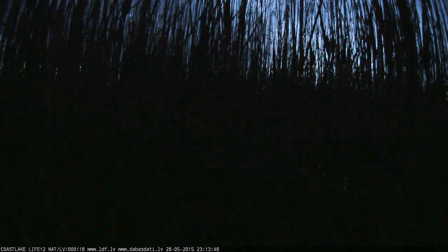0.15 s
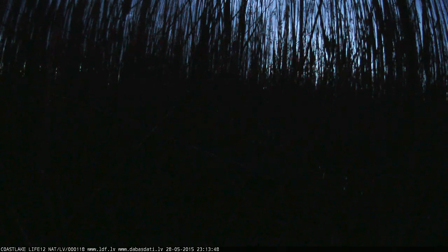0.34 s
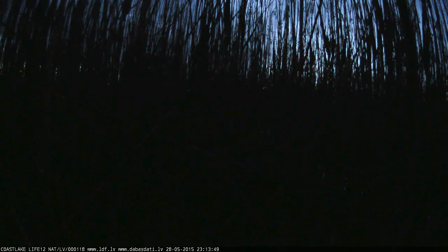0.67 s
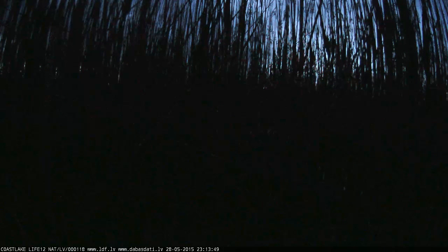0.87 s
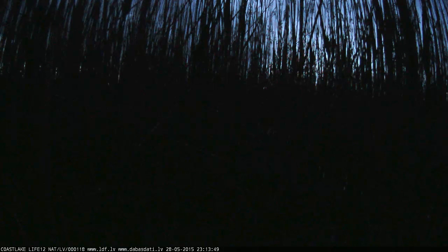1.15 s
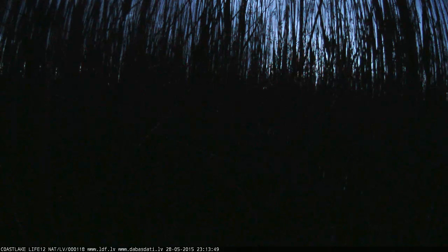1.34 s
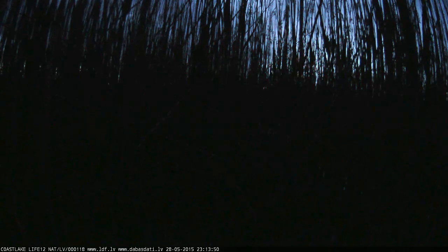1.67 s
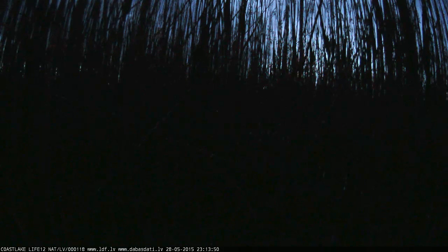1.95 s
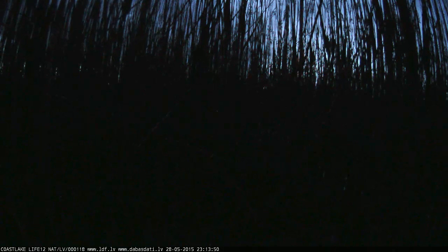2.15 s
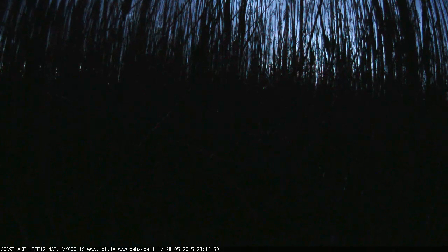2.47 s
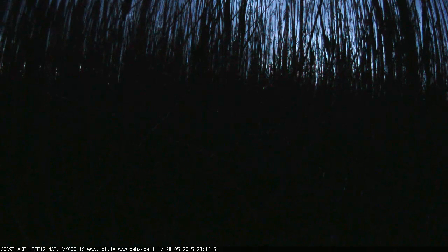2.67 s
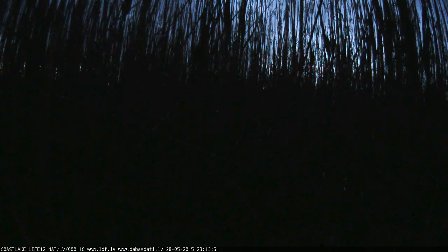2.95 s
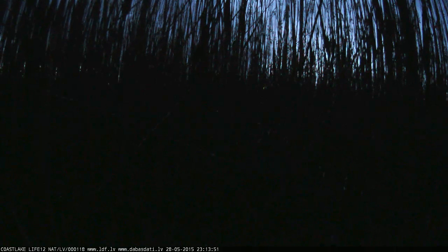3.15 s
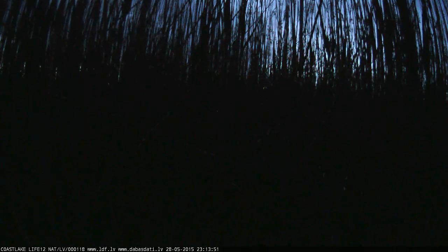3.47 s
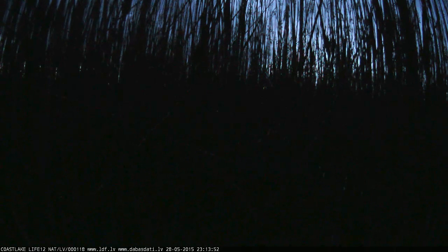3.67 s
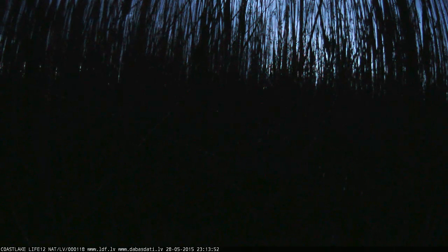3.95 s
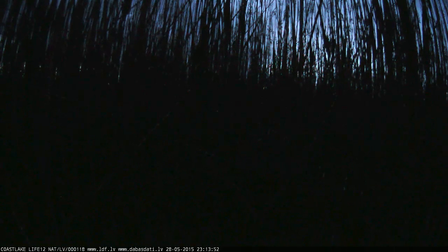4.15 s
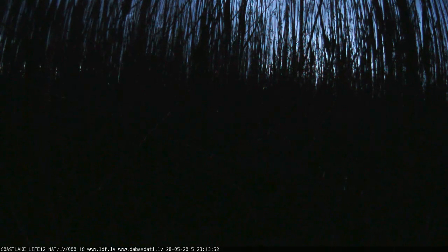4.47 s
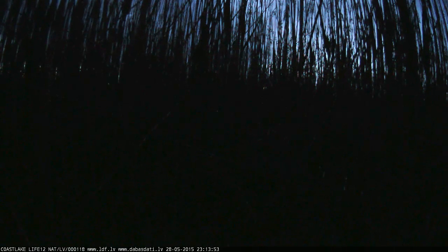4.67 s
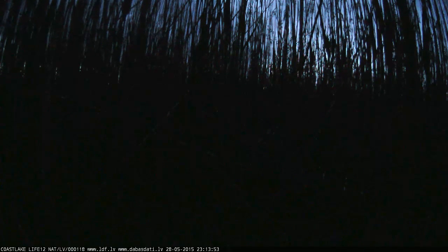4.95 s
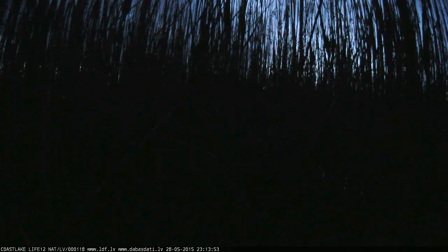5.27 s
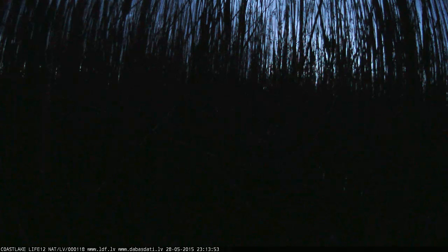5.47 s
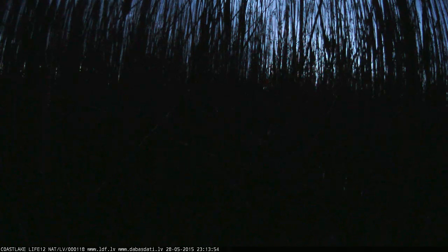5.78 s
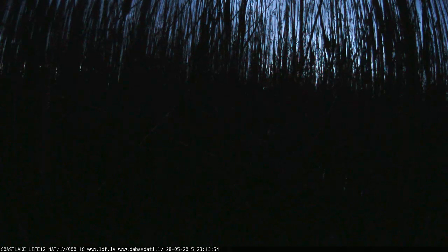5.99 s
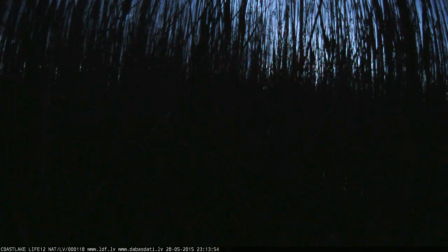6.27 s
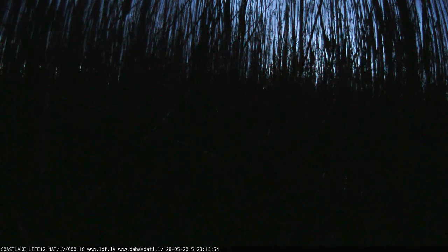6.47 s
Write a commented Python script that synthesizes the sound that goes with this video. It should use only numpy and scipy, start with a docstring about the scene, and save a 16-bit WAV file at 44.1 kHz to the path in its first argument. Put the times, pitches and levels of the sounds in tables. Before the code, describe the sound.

A bittern booms twice in quiet reeds while a small bird's sharp, buzzy peeps speed up over a distant chattering warbler.

```python
"""A bittern's deep boom opens a still evening in a reed bed: its inflated gullet rings as an almost
pure tone, and far shores send it back. It gulps and booms again; later a second bittern hoots far off.
A small marsh bird nearby gives sharp, buzzy peeps, bursts of pulses that ring on in the reeds,
and they come faster and faster. A distant warbler chatters in raspy glides,
over low background noise whose level wavers and the hiss of the microphone."""
import sys
import numpy as np
from scipy import signal
from scipy.fft import rfft, irfft
from scipy.io import wavfile
from scipy.ndimage import uniform_filter1d

SR = 44100
rng = np.random.default_rng(int(sys.argv[2]) if len(sys.argv) > 2 else 0)


def unload_audio(sound):
    """Save the sound as a 16-bit wav file, at the path given as the first command line argument."""
    columns = np.transpose(np.atleast_2d(sound))
    # keep every value between -1 and 1, then stretch to whole-number steps
    steps = np.round(np.clip(columns, -1, 1) * 32767)
    wavfile.write(sys.argv[1], SR, steps.astype(np.int16))


N = 291942


def gain_of(db):
    """Decibels to a gain factor."""
    return 10 ** (np.asarray(db) / 20)


def unit_rms(x):
    """Scales a sound to an rms of 1."""
    return x / np.sqrt(np.mean(x ** 2) + 1e-20)


def add(mix, start_s, sound):
    """Mixes a sound in at its start time, which may lie before zero."""
    at = round(start_s * SR)
    sound, part = sound[max(-at, 0):], mix[max(at, 0):]
    part[:len(sound)] += sound[:len(part)]


def drift(t, hz):
    """Smooth random modulation, rms about 1, made of rates up to hz."""
    rates, phases = rng.random((2, 24, 1))
    return np.sin(2 * np.pi * (hz * rates * t + phases)).sum(0) / np.sqrt(len(rates) / 2)


def band(x, low_hz, high_hz, order=2):
    """Band-passes a sound."""
    return signal.sosfilt(signal.butter(order, [low_hz, high_hz], "band", fs=SR, output="sos"), x)


def equalise(x, curve):
    """Applies an EQ curve of (frequency_hz, gain_db) points."""
    hz, db = np.transpose(curve)
    bins_hz = np.fft.rfftfreq(len(x), 1 / SR)
    gains = gain_of(np.interp(np.log(bins_hz + 1), np.log(hz), db))
    return irfft(rfft(x) * gains, len(x))


def scatter(x, t60_s, build_s):
    """Countless small reflections build up and decay, in a reverb tail cut at 3 s."""
    t = np.arange(3 * SR) / SR
    build_up = 1 - np.exp(-(t / build_s) ** 2)
    tail = rng.standard_normal(len(t)) * 10 ** (-3 * t / t60_s) * build_up
    return signal.fftconvolve(x, tail / np.linalg.norm(tail))[:N]


# tone colour of still air and microphone hiss: frequency_hz, relative_db
AIR_EQ = [(25, 0.5), (50, -5.5), (80, -15), (130, -12), (200, -16), (270, -19), (500, -23), (1000, -25),
          (1600, -22.5), (2200, -22.5), (3100, -21), (3700, -25.5), (4500, -27.5), (12000, -28.5)]

def background(wash_db=-60.5, low_noise_db=-66.6, waver_db=2.5):
    """A faint wash of marsh air and hiss, over low background noise whose level wavers."""
    waver = gain_of(waver_db * drift(np.arange(N) / SR, hz=5.7))
    low_noise = unit_rms(waver * band(rng.standard_normal(N), low_hz=22.8, high_hz=74, order=1))
    wash = unit_rms(equalise(rng.standard_normal(N), AIR_EQ))
    return gain_of(wash_db) * wash + gain_of(low_noise_db) * low_noise


# the pitches that the reed bed throws back best: frequency_hz, gain_db
REED_EQ = [(1500, -10), (2200, -3.5), (2420, 5), (2550, 0), (2660, 6), (2760, 1), (2880, 2.5), (3000, 2.5),
           (3130, 6.5), (3300, -3), (3800, -10)]

def reed_bed(x, stems_db=-12, marsh_db=-11):
    """A quick scatter from the nearest stems and a long ring over the marsh."""
    stems = gain_of(stems_db) * scatter(x, t60_s=.31, build_s=.015)
    marsh = gain_of(marsh_db) * scatter(x, t60_s=1.78, build_s=.052)
    return equalise(stems + marsh, REED_EQ)


def syllable(length_s, pitch_hz, level_db, partial, glide, *, bend, side_db, rasp=.3, waver_hz=24):
    """A raspy partial and its two neighbours glide (octaves/s); bend (octaves) shifts both ends."""
    t = np.arange(0, length_s, 1 / SR) - length_s / 2
    detune = 1 + .005 * rng.standard_normal()  # no two syllables have quite the same pitch
    pitch = pitch_hz * detune * 2 ** (glide * t + bend * (2 * t / length_s) ** 2)
    phase = 2 * np.pi * np.cumsum(pitch + waver_hz * drift(t, hz=248)) / SR
    tone = np.sin(phase) * (1 + 2 * gain_of(side_db) * np.cos(phase / partial))
    roughness = 1 + rasp * drift(t, hz=222.3)
    return gain_of(level_db) * unit_rms(tone * roughness * signal.windows.tukey(len(t), .28))


def sing(table, **voice):
    """Sings one kind of syllable at each of its start times."""
    out = np.zeros(N)
    for starts_s, *note in table:
        for start_s in starts_s:
            add(out, start_s, syllable(*note, **voice))
    return out


# clear falling slurs: starts_s, length_s, pitch_hz, relative_db
CLEAR_SLURS = [((.461, .559), .034, 2400, -59.5), ((1.311, 1.511), .026, 2420, -59), ((1.692,),
               .02, 2200, -63), ((2.408, 2.506), .029, 2160, -62.3), ((4.375,), .023, 2436, -59.5),
               ((5.84,), .019, 2046, -65), ((6.555,), .024, 1780, -68)]
# harsh falling ticks: starts_s, length_s, pitch_hz, relative_db
HARSH_TICKS = [((.233, .279), .028, 2540, -63), ((2.098, 2.142, 2.19), .025, 2680, -62), ((2.744, 2.788),
               .023, 2850, -65)]
# quick upward zips: starts_s, length_s, pitch_hz, relative_db
RISING_ZIPS = [((1.677, 1.845), .027, 2600, -63), ((1.908,), .034, 2620, -60)]
# low, gently rising notes: starts_s, length_s, pitch_hz, relative_db
LOW_CHIRPS = [((4.495, 4.538), .02, 1860, -67.5), ((4.44, 4.958, 5.4, 5.69, 6.052), .026, 1850, -70),
              ((5.004, 5.05), .022, 1930, -63.5), ((5.275, 5.517), .052, 1950, -65), ((6.1, 6.15),
              .024, 1900, -65)]
# thin whistles: starts_s, length_s, pitch_hz, relative_db, partial_number, glide_octaves_per_s
THIN_WHISTLES = [((.25, .563, .754), .035, 3030, -65.3, 5, -2.6), ((.775, .82), .044, 2485, -62, 3, .4),
                 ((.87,), .061, 2590, -62, 3, .3), ((1.048,), .061, 2510, -62, 3, -.7), ((3.424,),
                 .022, 2370, -66, 5, .8), ((3.455, 3.491, 3.537), .027, 2460, -58, 5, 1)]
# arched nasal notes: starts_s, length_s, pitch_hz, relative_db, partial_number, glide_octaves_per_s
NASAL_NOTES = [((.01, .027), .016, 2610, -62, 3, 4), ((.042, .059, .076), .018, 2770, -60, 3, 3), ((.15,),
               .08, 2790, -66.5, 3, .8), ((1, 1.286, 1.482), .021, 2510, -63, 4, -.3), ((2.975, 3.2),
               .09, 2335, -65.5, 4, 1), ((4.112, 4.18), .047, 2465, -62.5, 6, -1.5)]

def warbler(direct_db=1, wet_db=3):
    """Six kinds of syllable, each with its own glide and harshness; distance makes them wet."""
    song = (sing(CLEAR_SLURS, partial=3, glide=-17, bend=.08, side_db=-11)
            + sing(HARSH_TICKS, partial=3, glide=-21, bend=.14, side_db=0)
            + sing(RISING_ZIPS, partial=3, glide=16, bend=-.02, side_db=-9)
            + sing(LOW_CHIRPS, partial=3, glide=5.2, bend=-.04, side_db=-12, rasp=.4)
            + sing(THIN_WHISTLES, bend=-.02, side_db=-12.5, rasp=.25, waver_hz=18)
            + sing(NASAL_NOTES, bend=-.035, side_db=-4.5, rasp=.45))
    song = band(song, low_hz=1390, high_hz=3300, order=5)
    return gain_of(direct_db) * song + gain_of(wet_db) * reed_bed(song)


def peep(length_s, top_hz, end_hz, level_db, pulse_hz, width_hz=205, chirp=.23, flutter_db=1.1):
    """A burst of fast, uneven pulses sounds through a resonance that arches up and flicks down."""
    t = np.arange(0, length_s, 1 / SR)
    progress = t / length_s
    jitter = 1 + .02 * drift(t, hz=130.2)
    rate_hz = pulse_hz * np.interp(progress, [0, .5, 1], [1, 1, .89]) * jitter
    cycles = np.cumsum(rate_hz) / SR - .35  # the first pulse lands .35 of a cycle in
    resonance_hz = np.interp(progress, [0, .36, .62, 1], [.95 * top_hz, top_hz, .95 * top_hz, end_hz])
    harmonics = np.arange(6, 17)[:, None]
    off_peak = (harmonics * rate_hz - resonance_hz) / width_hz
    # lower partials come a little late, so each pulse is a tiny falling chirp
    partials = np.cos(2 * np.pi * harmonics * cycles + chirp * off_peak ** 2)
    buzz = (np.exp(-off_peak ** 2 / 2) * partials).sum(0)
    contour_db = np.interp(progress, [0, .4, .75, 1], [-4.5, 1.5, -1.5, -6])
    envelope = gain_of(contour_db + flutter_db * drift(t, hz=170)) * signal.windows.tukey(len(t), .08)
    return gain_of(level_db) * unit_rms(envelope * buzz)


# peeps that crowd ever closer: start_s, length_s, top_hz, end_hz, level_db
NEAR_PEEPS = [ (2.325, .0282, 2727, 2400, -42), (3.0328, .029, 2835, 2470, -38.5),
              (3.667, .034, 2864, 2400, -40.5), (4.2233, .028, 2860, 2490, -38),
              (4.7233, .036, 2960, 2410, -38.5), (5.1768, .032, 2890, 2415, -39.5),
              (5.466, .036, 2930, 2430, -38.5), (5.7427, .035, 2870, 2560, -37.5),
              (5.968, .0355, 2950, 2390, -38.5), (6.189, .032, 2940, 2450, -38),
              (6.411, .039, 2810, 2590, -38), (6.613, .03, 2850, 2450, -38.5)]
# the buzz quickens as the bird warms up, then holds: time_s, pulse_hz
BUZZ_RATE = [(2.325, 259.5), (4.5, 275.2)]
# first reflections off nearby reeds and water: delay_s, gain_db
EARLY_REFLECTIONS = [(.0047, -15), (.0094, -7.5), (.031, -16), (.046, -17.5), (.076, -17)]

def near_bird(low_noise_db=-25.8):
    """Close peeps with their first reflections and the ring of the reeds."""
    # swaying reeds answer a little differently: the peeps take turns on three reverb sends
    sends = np.zeros((3, N))
    for i, (start_s, *shape) in enumerate(NEAR_PEEPS):
        pulse_hz = np.interp(start_s, *np.transpose(BUZZ_RATE))
        add(sends[i % len(sends)], start_s, peep(*shape, pulse_hz))
    sends = band(sends, low_hz=1940, high_hz=3090, order=4)
    direct = sends.sum(0)
    early = np.zeros(N)
    for delay_s, gain_db in EARLY_REFLECTIONS:
        add(early, delay_s, gain_of(gain_db) * direct)
    # a faint low noise follows the loudness of each peep
    low_noise = unit_rms(band(rng.standard_normal(N), low_hz=215, high_hz=310, order=1))
    loudness = uniform_filter1d(abs(direct), size=300)
    ring = sum(reed_bed(send) for send in sends)
    return direct + early + ring + gain_of(low_noise_db) * loudness * low_noise


def hoot(pitch_hz, level_db, octave_db=-38, fuzz_hz=28):
    """The inflated gullet rings as an almost pure tone with a faint, fuzzy octave."""
    t = np.arange(len(pitch_hz)) / SR
    phase = 2 * np.pi * np.cumsum(pitch_hz) / SR
    tone = np.sin(phase) + gain_of(octave_db) * drift(t, fuzz_hz) * np.sin(2 * phase)
    return np.sqrt(2) * gain_of(level_db) * tone * signal.windows.tukey(len(t), .08)


def soft_hoot(curve):
    """A quiet hoot that follows a curve of pitch and level; returns its start time and its sound."""
    time_s, pitch_hz, level_db = np.transpose(curve)
    t = np.arange(time_s[0], time_s[-1], 1 / SR)
    return time_s[0], hoot(np.interp(t, time_s, pitch_hz), np.interp(t, time_s, level_db))


# every boom scoops up, overshoots and settles: since_start_s, pitch_hz
BOOM_SCOOP = [(0, 117), (.035, 140.6), (.055, 154), (.08, 144.5), (.36, 142.7)]

def boom(hold_s, level_db, attack_s=.058, release_db_per_s=120, length_s=.6):
    """A full boom swells, holds and dies away."""
    t = np.arange(0, length_s, 1 / SR)
    pitch_hz = np.interp(t, *np.transpose(BOOM_SCOOP))
    attack = 1 - np.exp(-t / attack_s)
    fade_db = release_db_per_s * np.maximum(t - hold_s, 0)
    return attack * hoot(pitch_hz, level_db - fade_db)


# a second bittern far away: time_s, pitch_hz, level_db
FAR_HOOT = [(5.98, 124.3, -76), (6.12, 126, -65), (6.22, 139, -69), (6.32, 138.7, -64),
            (6.43, 135.5, -59.5), (6.52, 137, -80)]
# the soft gulp that leads into the second boom: time_s, pitch_hz, level_db
LEAD_IN_GULP = [(2.56, 181.6, -75), (2.65, 181, -63), (2.78, 182, -63.5), (2.89, 193.8, -61.5),
                (2.98, 185.6, -59.5), (3.02, 166, -66), (3.06, 153, -62)]
# echoes from the far shores: delay_s, gain_db
SHORE_ECHOES = [(.435, -24.8), (.7079, -31), (1.0583, -29), (1.1825, -26), (2.0297, -36), (2.3524, -34)]
# the main bittern's booms: start_s, hold_s, level_db, echo_send_db
BITTERN_BOOMS = [(-.1033, .333, -38.1, 0), (3.165, .324, -38.4, -2.2)]

def bitterns(roll_db=-28):
    """Booms come back from each shore and, with the softer hoots, roll on faintly over the marsh."""
    calls = np.zeros(N)
    for start_s, hold_s, level_db, echo_send_db in BITTERN_BOOMS:
        call = boom(hold_s, level_db)
        add(calls, start_s, call)
        for delay_s, gain_db in SHORE_ECHOES:
            add(calls, start_s + delay_s, gain_of(gain_db + echo_send_db) * call)
    add(calls, *soft_hoot(LEAD_IN_GULP))
    add(calls, *soft_hoot(FAR_HOOT))
    return calls + gain_of(roll_db) * scatter(calls, t60_s=11, build_s=.41)


def scene():
    """All the birds and the background at one microphone."""
    return (bitterns() + near_bird() + warbler() + background())[None]


def record(dry):
    """The recorder cuts the top treble and sits on a small steady offset."""
    cutoff_hz, dc_offset = 12080, .0088
    low_pass = signal.firwin(511, cutoff_hz, window=("kaiser", 9), fs=SR)
    return dc_offset + signal.oaconvolve(dry, low_pass[None], "same")


dry = scene()
out = record(dry)
unload_audio(out)
```